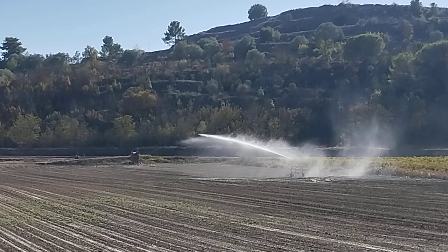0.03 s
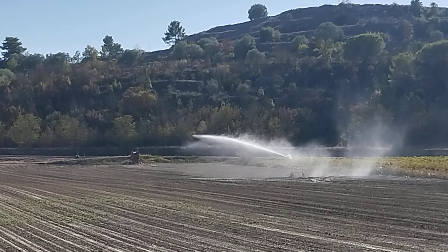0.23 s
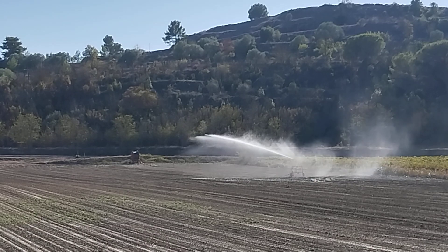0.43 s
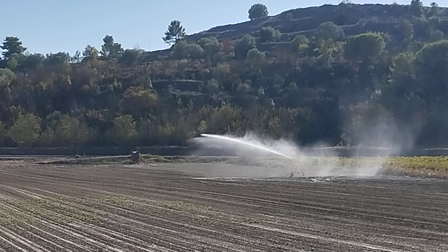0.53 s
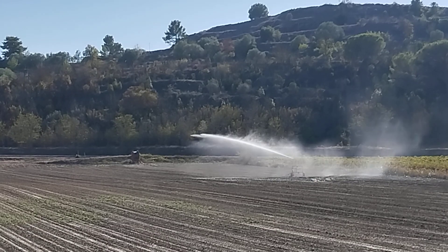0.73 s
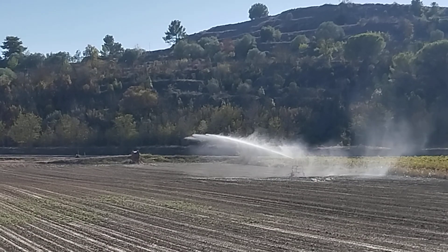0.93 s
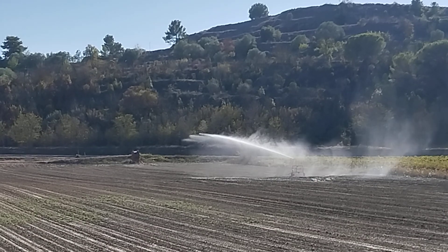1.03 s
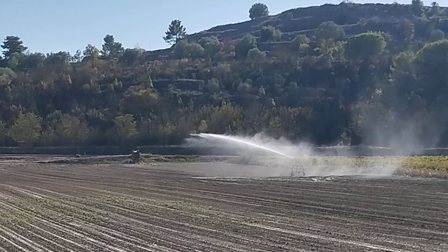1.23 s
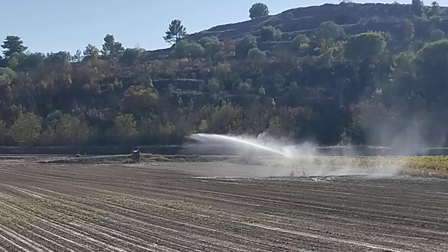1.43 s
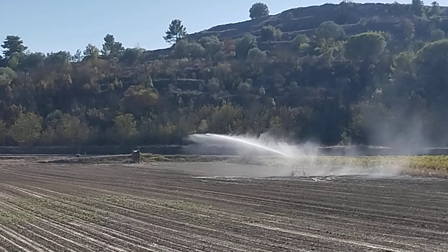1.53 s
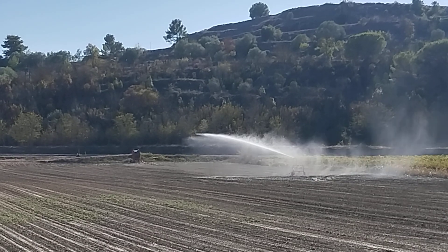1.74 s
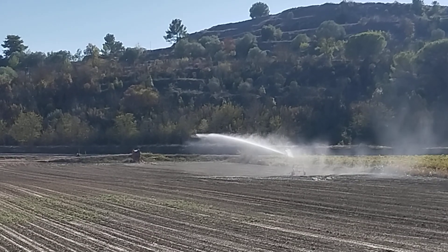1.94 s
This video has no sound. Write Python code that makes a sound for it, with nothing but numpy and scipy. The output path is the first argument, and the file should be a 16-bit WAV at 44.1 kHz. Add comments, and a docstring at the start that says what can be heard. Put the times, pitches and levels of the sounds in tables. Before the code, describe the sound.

Steady spray from a distant irrigation sprinkler, with regular splashes and wind buffeting the microphone.

```python
"""Irrigation gun in a field

A big irrigation gun throws its jet across an open field, some way off, and the falling spray hisses.
About twice a second its drive arm dips into the jet with a short splash, once followed by a dull clack.
A small insect gives two faint trills on the right, over the low murmur of the valley.
A gust of wind buffets the microphone, mostly on the left."""
import sys
import numpy as np
from scipy import signal
from scipy.fft import rfft, irfft
from scipy.io import wavfile

SR = 44100
rng = np.random.default_rng(int(sys.argv[2]) if len(sys.argv) > 2 else 0)


def transcribe(u):
    """Save the signal u as a 16-bit wav file named by the first command-line argument.

    u: samples, shape (n,) or (channels, n), limited to [-1, 1]; the rate is SR.
    q: integer samples, one column per channel.
    """
    v = np.clip(np.atleast_2d(u).T, -1, 1)
    q = np.round(v * 32767).astype(np.int16)
    wavfile.write(sys.argv[1], SR, q)


N = 88200
T = np.arange(N) / SR
HZ = np.maximum(np.fft.rfftfreq(N, 1 / SR), 1)
ARM_LAG_S = 0.00004  # the arm's splashes and slap reach the left side this much later


def from_db(db):
    """Turn decibels into a number to multiply by."""
    return 10 ** (np.asarray(db) / 20)


def rms_one(x):
    """Scale a signal to an average power of one."""
    return x / np.sqrt(np.mean(x ** 2) + 1e-20)


def across_hz(points, at=HZ):
    """Read a table of (pitch_hz, value) at every frequency."""
    hz, value = np.transpose(points)
    return np.interp(np.log(at), np.log(hz), value)


def band(centre_hz, width_hz):
    """A tone colour with one smooth peak."""
    return 1 / (1 + ((HZ - centre_hz) / width_hz) ** 2) ** 2


def pan(db):
    """Left and right gains; positive decibels make the left louder."""
    return from_db(np.array([[.5], [-.5]]) * db)


def flutter(rate_hz):
    """A smooth random wobble, about one in size."""
    return rms_one(irfft(rfft(rng.standard_normal(N)) / (1 + (HZ / rate_hz) ** 2), N))


def noise(colour, likeness=0, lag_s=0):
    """Stereo noise of power one. Likeness 0 gives unrelated sides, 1 equal ones; lag_s delays the left."""
    mid, side = rfft(rng.standard_normal((2, N)))
    alike = np.clip(likeness, -1, 1)
    left, right = colour * (np.sqrt(1 + alike) * mid + np.sqrt(1 - alike) * side * [[1], [-1]])
    return rms_one(irfft(np.array([left * np.exp(-2j * np.pi * HZ * lag_s), right]), N))


def spray():
    """Countless falling drops merge into a steady hiss, with one narrow band standing out."""
    # tone colour of the drops: pitch_hz, level_db
    colour = [(500, 4.5), (780, 3), (1050, 2.5), (1400, -1), (2000, -6), (2300, -6), (3300, -4.5),
              (4600, -8.5), (6200, -8), (8300, -18), (9700, -35.5), (12000, -38), (13500, -39)]
    # how alike the two sides are: pitch_hz, likeness
    likeness = [(500, 0.033), (800, 0.47), (1200, 0.53), (1600, 0.51), (1950, 0.68), (2500, 0.033),
                (3200, 0.36), (5000, 0.092), (8000, 0.055)]
    # the spray swells and eases a little: time_s, level_db
    swell = [(0, -1), (.45, 0.9), (1.15, 0.5), (1.6, -0.53), (2, 0.8)]
    alike, lag_s = across_hz(likeness), -0.000471
    hiss = from_db(-63.5) * noise(from_db(across_hz(colour)), alike, lag_s)
    ring = from_db(-73) * noise(band(centre_hz=1828, width_hz=374), alike, lag_s)
    level_db = np.interp(T, *np.transpose(swell)) - 0.2 * flutter(rate_hz=150)
    return from_db(level_db) * pan(-0.5) * (hiss + ring)


def valley():
    """The far countryside gives a low, even murmur and a faint drone."""
    # tone colour of the murmur: pitch_hz, level_db
    colour = [(25, 10.5), (60, 3.5), (120, -0.5), (200, -1), (300, -2), (400, -1.5), (500, -6), (720, -5),
              (1100, -26), (3000, -63.5), (9000, -70)]
    # how alike the two sides are: pitch_hz, likeness
    likeness = [(60, 1), (200, 1), (400, 0.82), (550, 0.2), (800, 0.15)]
    alike = across_hz(likeness)
    murmur = from_db(-58.5) * noise(from_db(across_hz(colour)), alike)
    drone = from_db(-74) * noise(band(centre_hz=403.3, width_hz=19), alike)
    return murmur + drone


def wind():
    """Swirls of air rumble on the microphone; the stronger the gust, the more small ones flap along."""
    # strength of the gust: time_s, left_db, right_db
    gust = [(0, -87.5, -60), (.42, -70, -59.5), (.52, -54, -53), (.70, -62.5, -54.5), (.98, -57, -53.5),
            (1.092, -55, -41.5), (1.159, -59, -63), (1.24, -57.5, -53), (1.282, -30, -46.5),
            (1.408, -34.5, -39.5), (1.501, -28, -33.5), (1.555, -40.5, -37.5), (1.638, -27, -36.5),
            (1.74, -37.5, -30.5), (1.82, -39, -36.5), (1.885, -62.5, -44), (1.93, -44, -44), (2, -60, -47)]
    # tone colour of the rumble: pitch_hz, level_db
    rumble_colour = [(20, -2), (55, 2.5), (100, -2), (150, -20), (230, -21), (500, -86), (3000, -110)]
    # tone colour of the small swirls: pitch_hz, level_db
    swirl_colour = [(70, -30), (120, 6), (165, -2), (250, -12.5), (350, -15), (600, -62.5), (3000, -100)]
    times, *sides = np.transpose(gust)
    gust_db = np.array([np.interp(T, times, side_db) for side_db in sides])
    swirl_db = -38 + 2.17 * (gust_db + 28)  # small swirls grow faster than the gust
    swirls = from_db(swirl_db) * noise(from_db(across_hz(swirl_colour)))
    rumble = from_db(gust_db) * noise(from_db(across_hz(rumble_colour)))
    return rumble + swirls


def air_push():
    """Too low to hear, the air pressure on the microphone wanders and swells once."""
    start_s, rise_s = 0.17, 0.074
    progress = np.maximum(T - start_s, 0) / rise_s
    swell = signal.sosfilt(signal.butter(2, 60, fs=SR, output="sos"), progress * np.exp(1 - progress))
    drift = from_db(-45.5) * flutter(rate_hz=2)
    return from_db(-22.5) * pan(0.5) * swell + drift


def splashes():
    """The arm tears the jet: a spattering hiss with two bright bands, held while it is in the water."""
    # each dip of the arm: start_s, length_s, level_db, pitch_hz, upper_band_db, lower_band_db
    dips = [(0.078, 0.064, -62, 5900, -6.5, -35), (0.632, 0.06, -59.5, 5830, 4, -1.5),
            (1.184, .066, -62, 6050, 2.5, 1), (1.738, 0.072, -60, 5500, 0.5, -2.5)]
    # tone colour of a splash: pitch_hz, level_db
    colour = [(400, -10.5), (1100, 0), (1700, -1.5), (2350, -1), (2850, 2), (3600, 5), (5000, 1),
              (6800, -1), (8700, -5.5), (9700, -29), (11500, -18.5), (13000, -40.5)]
    # how alike the two sides are: pitch_hz, likeness
    likeness = [(500, .4), (1600, 1), (3600, 0.38), (5800, 1), (8500, 0.4)]
    hiss_rise_s, bright_rise_s, fall_s, sag_db_per_s = 0.015, 0.018, 0.01, 62
    out, alike = 0, across_hz(likeness)
    for start_s, length_s, level_db, pitch_hz, upper_db, lower_db in dips:
        age = np.maximum(T - start_s, 0)
        body = noise(from_db(across_hz(colour)), alike, ARM_LAG_S)
        ring = noise(band(centre_hz=2870, width_hz=99), alike, ARM_LAG_S)  # a narrow ring sounds within each splash
        upper = from_db(upper_db) * noise(band(pitch_hz, width_hz=670), alike, ARM_LAG_S)
        lower = from_db(lower_db) * noise(band(0.755 * pitch_hz, width_hz=670), alike, ARM_LAG_S)
        hiss = (body + from_db(-10) * ring) * np.minimum(age / hiss_rise_s, 1)
        bright = (upper + lower) * np.minimum(age / bright_rise_s, 1) * from_db(-sag_db_per_s * age)
        fade = np.exp(-np.maximum(age - length_s, 0) / fall_s)
        out = out + from_db(level_db) * (hiss + bright) * fade
    spatter_db = 1.77 * flutter(rate_hz=130)
    return out * from_db(spatter_db)


def field_echoes(sound):
    """The field's edge sends back a few weak, dull echoes, with left and right swapped."""
    # each echo: delay_s, level_db
    echoes = [(0.029, -12), (.058, -35), (0.095, -17)]
    dull = signal.sosfilt(signal.butter(1, 5000, fs=SR, output="sos"), sound[::-1] + 1e-18)
    for delay_s, level_db in echoes:
        sound = sound + from_db(level_db) * np.array([np.interp(T - delay_s, T, side) for side in dull])
    return sound


def insect():
    """Each trill of the insect is a quick run of thin, uneven ticks."""
    # each trill: start_s, length_s, level_db
    trills = [(.308, 0.095, -69), (1.526, 0.088, -70)]
    # tone colour of a tick: pitch_hz, level_db
    colour = [(5000, -29), (6700, -5), (7500, -1.5), (8500, -19.5), (10000, -38.5), (11500, -14),
              (13500, -38)]
    ticks_per_s, decay_s, unevenness = 128, 0.002, 0.23
    rate = ticks_per_s * np.exp(unevenness * flutter(rate_hz=78))
    loudness = 0
    for start_s, length_s, level_db in trills:
        since_tick = np.cumsum(rate * (T > start_s) / SR) % 1 / ticks_per_s
        singing = (T > start_s) & (T < start_s + length_s)
        loudness = loudness + from_db(level_db) * np.exp(-since_tick / decay_s) * singing
    return loudness * pan(-10) * noise(from_db(across_hz(colour)))


def buffets():
    """Single large swirls of air pass the microphone as short, round thumps."""
    # each thump: peak_s, level_db, pitch_hz, left_minus_right_db
    thumps = [(0.519, -48, 68, -23), (1.296, -33.5, 114, 18), (1.315, -33, 84, 15), (1.375, -31.5, 88, 25),
              (1.486, -33, 52.2, 21.5), (1.585, -35.5, 157.4, 21.5), (1.664, -33.5, 160, 29),
              (1.687, -31, 105, 21.5)]
    out, spread_cycles = 0, 0.42
    for peak_s, level_db, pitch_hz, pan_db in thumps:
        cycles = (T - peak_s) * pitch_hz
        hump = np.exp(-np.minimum((cycles / spread_cycles) ** 2, 20))
        out = out + from_db(level_db) * pan(pan_db) * np.cos(2 * np.pi * cycles) * hump
    return out


def clack():
    """The arm gives a wet double knock, blurred by distance, with a short metallic ring."""
    # the knock and its rebound: start_s, level_db
    knocks = [(1.804, -48), (1.813, -55)]
    # tone colour of a knock: pitch_hz, level_db
    colour = [(300, -1), (700, -0.5), (1050, -8), (1500, 0), (2100, -2), (2550, -4.5), (2900, -1),
              (3500, -1), (4100, -15), (6000, -16), (8500, -22), (11000, -52)]
    # how alike the two sides are: pitch_hz, likeness
    likeness = [(500, 0.86), (3000, 0.6)]
    # the notes the arm rings at: pitch_hz, level_db
    notes = [(1648, -3), (1928, -4), (2332, 0), (2813, -2), (2916, -6), (3171, 2), (3350, -2), (3577, -2)]
    rise_s, decay_s, ring_s = 0.0026, 0.014, 0.11
    loudness = 0
    for start_s, level_db in knocks:
        age = np.maximum(T - start_s, 0)
        loudness = loudness + from_db(level_db) * np.minimum(age / rise_s, 1) * np.exp(-age / decay_s)
    slap = loudness * noise(from_db(across_hz(colour)), across_hz(likeness), ARM_LAG_S)
    first_s, first_db = knocks[0]
    age = np.maximum(T - first_s, 0)
    ring = sum(from_db(db) * np.sin(2 * np.pi * (hz * age + rng.random())) for hz, db in notes)
    ring_db = first_db - 12 - 60 * age / ring_s
    return slap + ring * from_db(ring_db) * np.minimum(age / rise_s, 1)


def scene():
    """The irrigation gun, the countryside and the wind together."""
    arm = field_echoes(splashes() + clack())
    return arm + spray() + valley() + insect() + wind() + buffets() + air_push()


def record(dry):
    """Each pitch leans left or right; the sound fades in and out quickly and loses its highest treble."""
    # balance of the microphone: pitch_hz, left_minus_right_db
    balance = [(100, 4.5), (1000, -2), (3500, -.5), (6000, -1), (7000, 1.5), (8200, -8.5), (11000, 0)]
    start_s, fade_in_s, fade_out_s, cutoff_hz = 0.036, 0.012, 0.004, 15700
    mirrored = np.hstack([dry, dry[:, ::-1]])  # forwards then backwards, so the ends join smoothly
    mirrored_hz = np.maximum(np.fft.rfftfreq(2 * N, 1 / SR), 1)
    heard = irfft(rfft(mirrored) * pan(across_hz(balance, mirrored_hz)))[:, :N]
    fade = np.clip(np.minimum((T - start_s) / fade_in_s, (T[-1] - T) / fade_out_s), 0, 1)
    return signal.sosfilt(signal.cheby2(12, 70, cutoff_hz, fs=SR, output="sos"), heard * fade)


dry = scene()
out = record(dry)
transcribe(out)
```